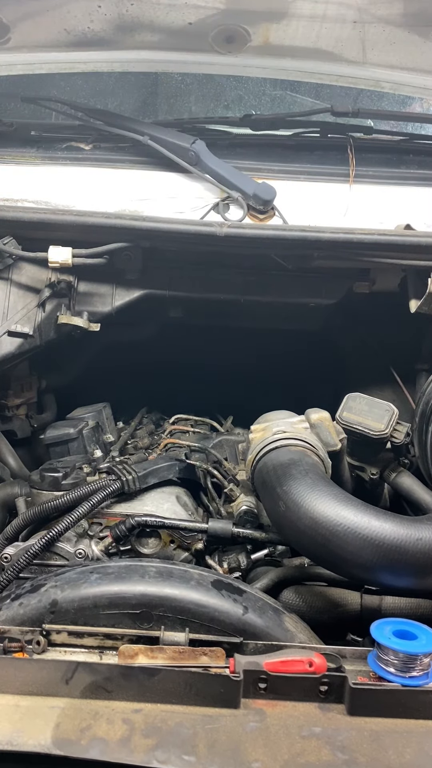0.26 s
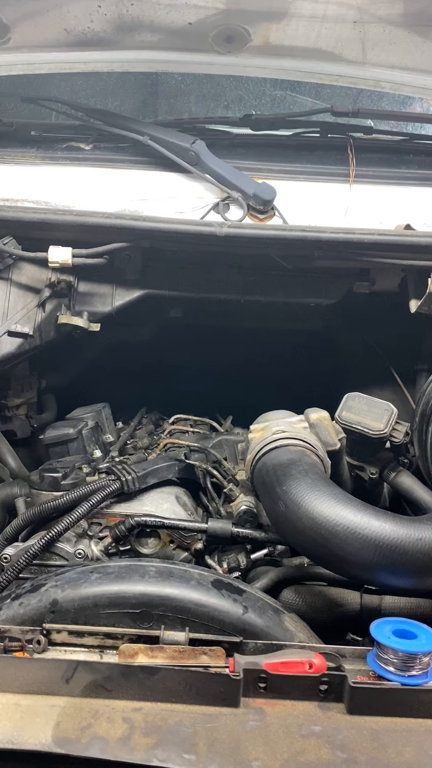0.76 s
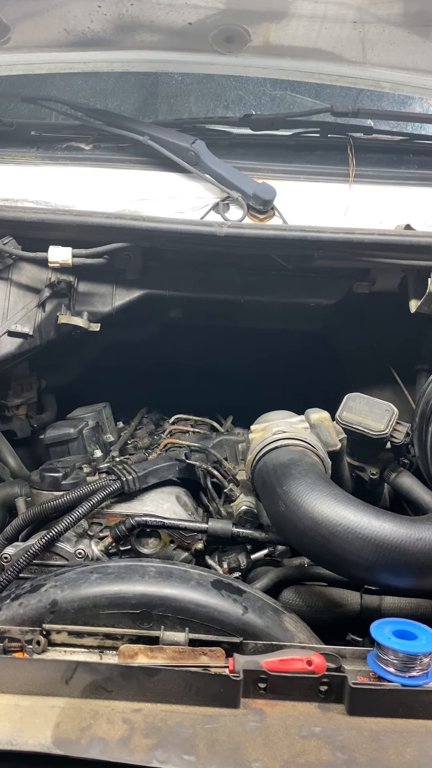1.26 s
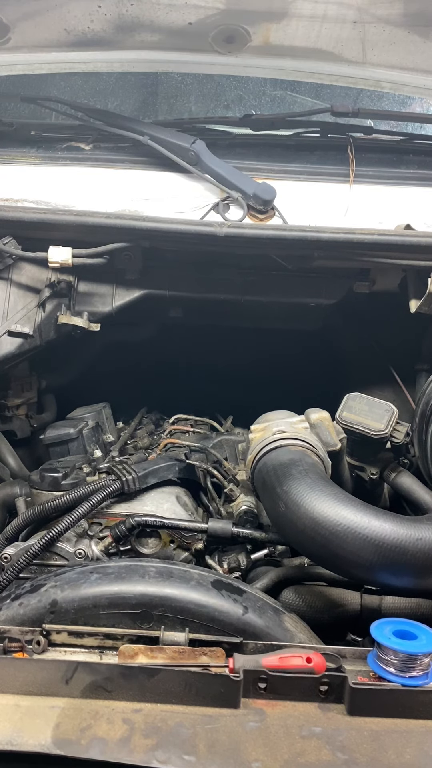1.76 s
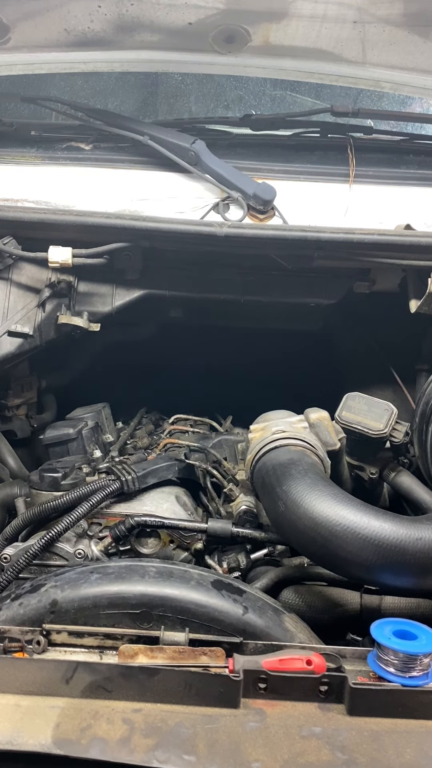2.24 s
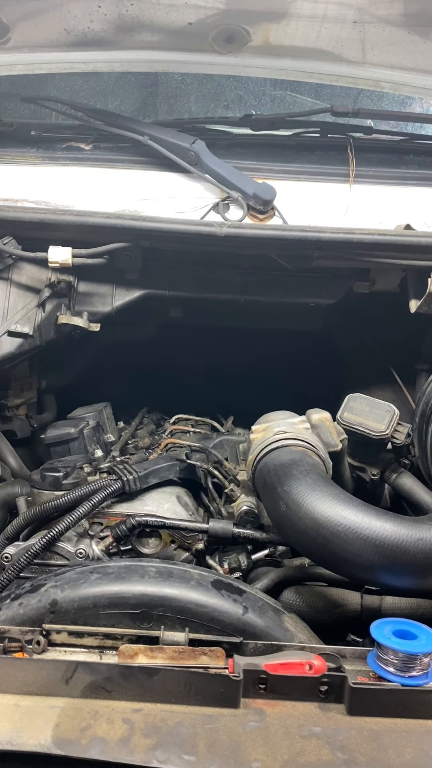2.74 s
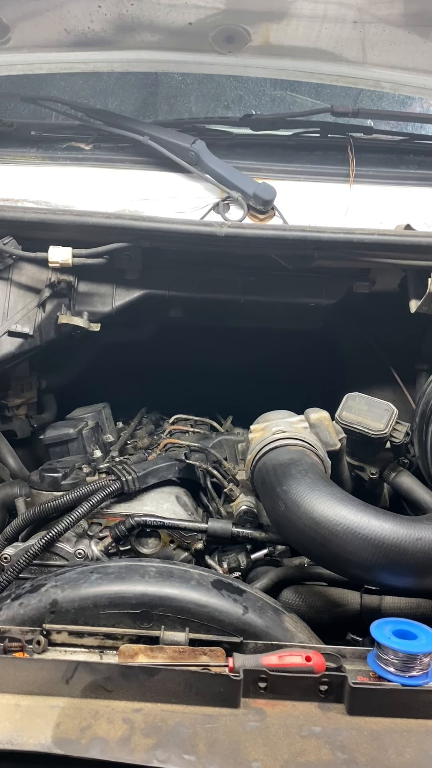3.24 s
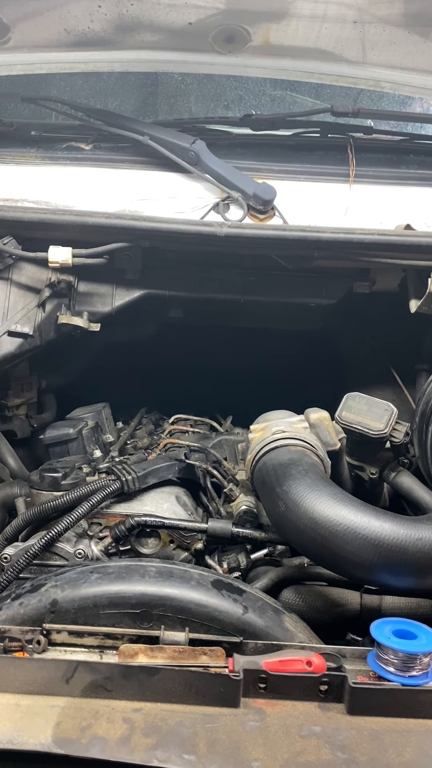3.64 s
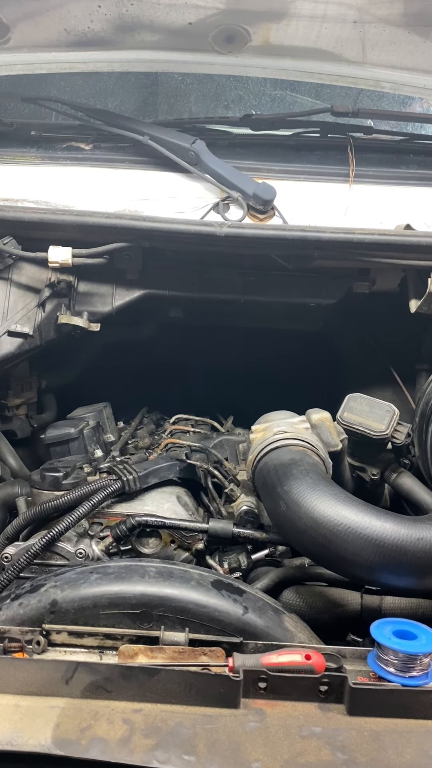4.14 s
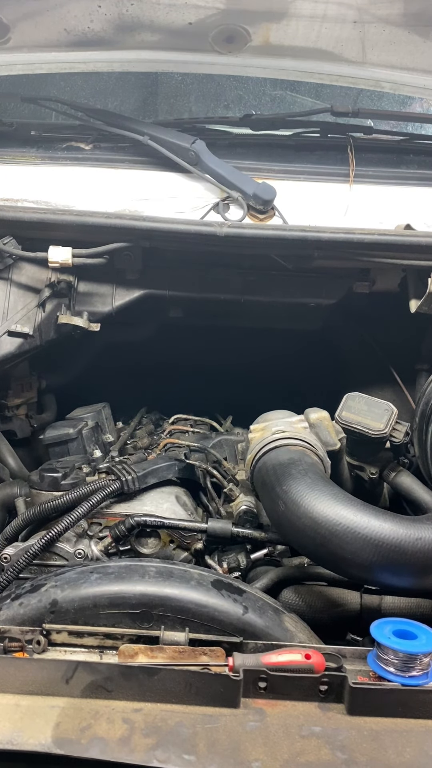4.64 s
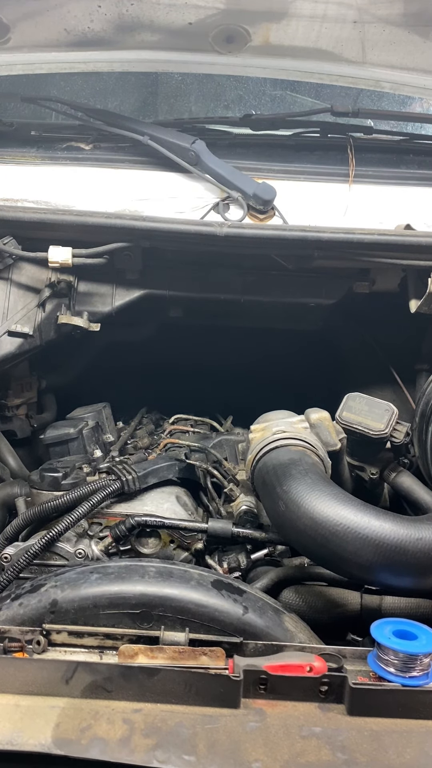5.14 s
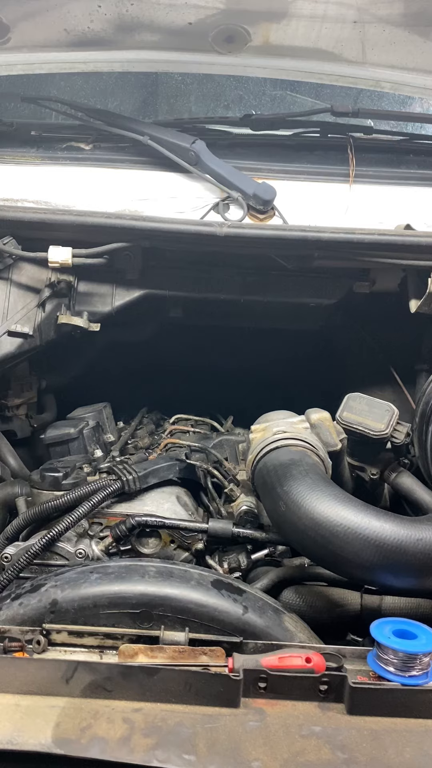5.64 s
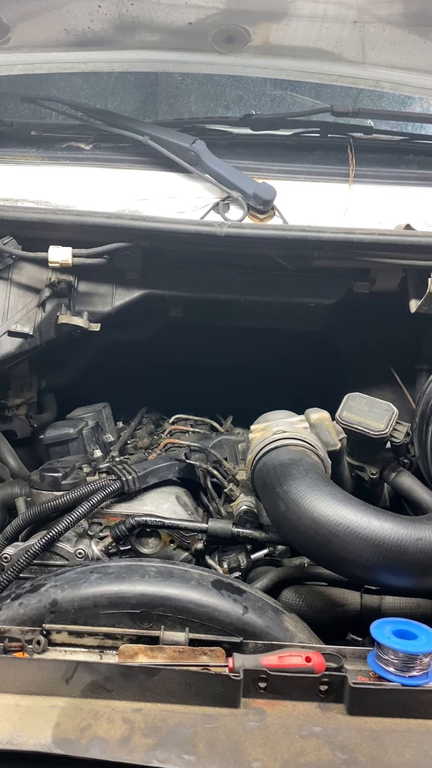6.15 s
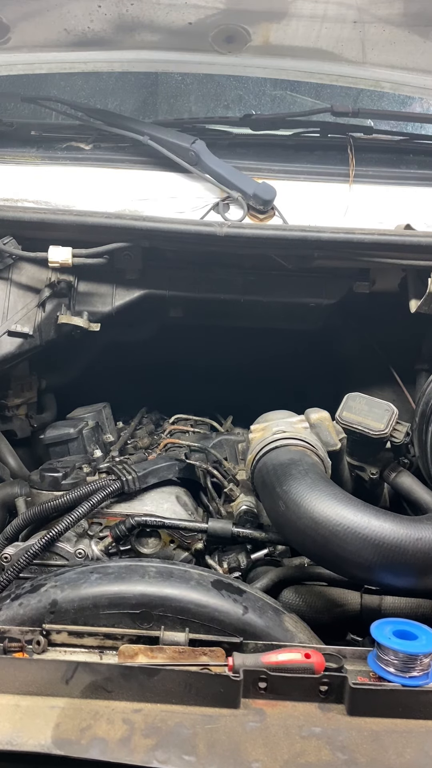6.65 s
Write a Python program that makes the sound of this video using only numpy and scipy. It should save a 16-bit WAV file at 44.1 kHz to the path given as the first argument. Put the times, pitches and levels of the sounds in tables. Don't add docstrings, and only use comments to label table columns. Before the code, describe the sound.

From 0 s the starter is already engaged, and it cranks a five-cylinder diesel without a break until about 7 s. Around seven strokes pass each second, grouped in uneven fives lasting about 0.7 s. Each stroke opens with a short bright rattle as gear teeth catch, swells into a coarse midrange grind as compression slows the crank, then loosens as it springs onward. The tooth growl bends between roughly 350 and 440 Hz, with hollow ringing from sump, covers and bell housing and an unsteady whine. Brushes and belts whirr beneath, with low body rumble, soft intake thuds and booming pipe puffs. The first two seconds ring slightly heavier; at 2.7 s a belt gives one tiny high chirp. The pace sags almost imperceptibly. No ignition, no wind-down. Close, dry outdoor phone pickup, nearly mono with slight stereo spread.

```python
import sys
import numpy as np
from scipy import signal
from scipy.fft import rfft, irfft, next_fast_len
from scipy.io import wavfile
from scipy.ndimage import uniform_filter1d, map_coordinates

SR = 44100
rng = np.random.default_rng(int(sys.argv[2]) if len(sys.argv) > 2 else 0)


def unload_wav(signal):
    wavfile.write(
        sys.argv[1],
        SR,
        np.round(np.clip(np.atleast_2d(signal).T, -1, 1) * 32767).astype(np.int16),
    )


def volts_from_decibels(level):
    exponent = np.asarray(level, float) / 20
    return 10 ** exponent


N = 304290
TIME = np.arange(N) / SR
HZ = np.fft.rfftfreq(next_fast_len(N + 16384), 1 / SR)


def unit(x):
    return x / np.sqrt(np.mean(x ** 2) + 1e-20)


def along(points):
    f, db = np.transpose(points)
    return volts_from_decibels(np.interp(np.log(HZ + 1), np.log(f + 1), db))


def mode(hz, width):
    return 1j * HZ * width / (hz * hz - HZ * HZ + 1j * HZ * width)


def modes(rows):
    return sum(volts_from_decibels(db) * mode(hz, width) for hz, width, db in rows)


def block(spectrum, depth_db, body):
    return along(spectrum) * (1 + volts_from_decibels(depth_db) * body)


def filtered(x, response):
    size = 2 * len(HZ) - 2
    return irfft(rfft(x, size) * response, size)[..., :N]


def wobble(rate):
    coarse = TIME[::32]
    knots = rng.standard_normal(int(N * rate / SR) + 4)
    return np.interp(TIME, coarse, map_coordinates(knots, [coarse * rate]))


def held(x, steady):
    size = np.sqrt(np.abs(uniform_filter1d(unit(x) ** 2, size=900))) + 0.34
    return unit(x / size ** steady)


# (start t/s, sump level/dB, cover level/dB, bell housing level/dB, late first load [share of stroke])
CYCLES = [(-0.324, 4, 4, 1, 0.14), (0.369, 1.8, -1, -3.5, 0.12), (1.061, 1.3, 1, 0, 0.13),
          (1.752, 1.7, -1, 0.5, 0.018), (2.445, 1.5, -1, 1, 0), (3.138, 0.7, -0.8, 0.2, 0),
          (3.833, -0.5, 1.5, -0.4, 0), (4.528, -0.2, 0.3, -0.1, 0.0097), (5.225, 0.2, -0.3, 0.4, 0),
          (5.922, -0.2, 2, 1.7, 0.043), (6.619, -0.6, 0, 1, 0.039), (7.316, 0, 0, 0, 0)]


def every_cycle(shares):
    start = np.array(CYCLES)[:, 0]
    return (start[:-1, None] + np.diff(start)[:, None] * shares).ravel()


# (t [share of cycle], slack closing level/dB)
TAKE_UP = [
    (0.003, 1),
    (0.2493, 5),
    (0.4667, 5),
    (0.665, 4),
    (0.801, 1),
]


def strokes():
    start = every_cycle(np.array(TAKE_UP)[:, 0])
    return np.interp(TIME, start, np.arange(len(start)))


def chance(stroke, scatter_db):
    which = stroke.astype(int)
    return scatter_db * rng.standard_normal(which.max() + 1)[which]


# (fast t [share of stroke], fast tooth rate f/Hz, slow t [share of stroke], slow tooth rate f/Hz)
SPEED = [(0.13, 429, 0.65, 358), (0.04, 437, 0.58, 353), (0.04, 437, 0.55, 358), (0.05, 442, 0.67, 381),
         (0.16, 430, 0.81, 371)]


def crank_speed(stroke):
    order = np.arange(5)
    fast_at, fast, slow_at, slow = np.transpose(SPEED)
    turning_points = np.c_[order + fast_at, order + slow_at].ravel()
    turning_points = np.r_[slow_at[-1] - 1, turning_points, 5 + fast_at[0]]
    ends = np.r_[slow[-1], np.c_[fast, slow].ravel(), fast[0]]
    swing = np.interp(stroke % 5, turning_points, np.arange(12))
    part = swing.astype(int)
    return ends[part] + (ends[part + 1] - ends[part]) * np.sin(np.pi / 2 * (swing - part)) ** 2


# (catching level/dB, full t [share of stroke], full level/dB,
# letting go t [share of stroke], running free level/dB)
LOAD = [(-36, 0.31, -32, 0.65, -48), (-34, 0.52, -30.5, 0.46, -47), (-32.5, 0.51, -30, 0.37, -44),
        (-31.5, 0.11, -32.5, 0.73, -39.5), (-36, 0.32, -32, 0.76, -41)]


def gear_load(stroke):
    catch = .05
    slip_at, slip_done = .38, .55
    order = np.arange(5)
    first_db, full_at, full_db, go_at, free_db = np.transpose(LOAD)
    slip = go_at + slip_at * (1 - catch - go_at)
    slip_db = full_db + slip_done * (free_db - full_db)
    at = order[:, None] + np.c_[catch + 0 * full_at, full_at, go_at, slip, 1 - catch + 0 * full_at]
    db = np.c_[first_db, full_db, full_db, slip_db, free_db]
    load_db = np.interp(stroke, at.ravel(), db.ravel(), period=5)
    which = stroke.astype(int)
    late = (which % 5 == 0) * (stroke - which < np.array(CYCLES)[which // 5, -1])
    return load_db - 9 * uniform_filter1d(late * 1., size=400)


def ring_level(stroke, load_db, rows, column, sag_db, struck_db, scatter_db):
    which = stroke.astype(int)
    done = stroke - which
    hum_db, flare_at, flare_db, width = np.array(rows)[which % 5].T
    hum = volts_from_decibels(hum_db + sag_db * done + 1.3 * (load_db + 31))
    struck = 1 + volts_from_decibels(struck_db) * np.exp(-done / .05)
    flare = volts_from_decibels(flare_db) * np.exp(-((done - flare_at) / width) ** 2)
    cycle_db = np.array(CYCLES)[which // 5, column]
    size = (hum * struck + flare) * volts_from_decibels(cycle_db + chance(stroke, scatter_db))
    return 20 * np.log10(uniform_filter1d(size, size=300))


def teeth(rate, jitter, scatter_db, rough):
    at = np.flatnonzero(np.diff(np.floor(np.cumsum(rate) / SR)))
    luck = rng.standard_normal((len(at), 2))
    at = np.clip(at + jitter * luck[:, 0] * SR / rate[at], 0, N - 1).astype(int)
    blows = unit(np.bincount(at, volts_from_decibels(scatter_db * luck[:, 1]), N))
    scrape = unit(volts_from_decibels(1.48 * wobble(300)) * rng.standard_normal(N))
    return np.sqrt(1 - rough) * blows + np.sqrt(rough) * scrape


# (f/Hz, level/dB per Hz)
GRIND = [(150, -44), (230, -23.5), (400, -13), (900, -12.5), (1600, -11), (3000, -9.5), (4500, -15.5),
         (6000, -19), (7400, -29), (10000, -34.5), (13000, -34.5), (15600, -41)]
# (f/Hz, width f/Hz)
SUMP = (391, 10.1)
# (f/Hz, width f/Hz)
COVER = (546, 18.7)
# (f/Hz, width f/Hz)
BELL = (1252, 15.8)
# (hum level/dB, flare t [share of stroke], flare level/dB, flare width [share of stroke])
SUMP_RINGS = [(-79, 0.57, -38.5, 0.19), (-52, 0.48, -35.5, 0.11), (-46.5, 0.42, -37.5, 0.17),
              (-38.5, 0.563, -40, 0.054), (-71, 0.73, -38.5, 0.27)]
# (hum level/dB, flare t [share of stroke], flare level/dB, flare width [share of stroke])
COVER_RINGS = [(-56, 0.47, -43, 0.11), (-49, 0.14, -40, 0.41), (-40, 0.017, -38.5, 0.11),
               (-41, 0.23, -41, 0.43), (-50, 0.62, -45, 0.1)]
# (hum level/dB, flare t [share of stroke], flare level/dB, flare width [share of stroke])
BELL_RINGS = [(-30, 0.25, -27.5, 0.047), (-35.5, 0.44, -37, 0.041), (-42, 0.27, -35, 0.077),
              (-37.5, 0.36, -34, 0.13), (-35.5, 0.44, -27.5, 0.07)]


def gears(stroke, rate, load_db, grind_db, body):
    through_iron = np.exp(-1j * np.pi * 2e-6 * np.minimum(HZ, 5000) * HZ)
    drive = teeth(rate, jitter=.055, scatter_db=2, rough=.62)
    grind = unit(filtered(drive, block(GRIND, depth_db=1, body=body) * through_iron))
    grind = grind * volts_from_decibels(grind_db + .7 * wobble(40))

    sump_db = ring_level(stroke, load_db, SUMP_RINGS, column=1, sag_db=2, struck_db=-17, scatter_db=.7)
    sump = filtered(teeth(rate, jitter=.06, scatter_db=2, rough=.6), mode(*SUMP) * mode(391, 200))
    sump = volts_from_decibels(sump_db) * held(sump, steady=.85)

    cover_db = ring_level(stroke, load_db, COVER_RINGS, column=2, sag_db=-1.5, struck_db=-10, scatter_db=1.5)
    cover = filtered(teeth(rate, jitter=.1, scatter_db=3, rough=.8), mode(*COVER) * mode(546, 250))
    cover = volts_from_decibels(cover_db) * held(cover, steady=.7)

    bell_db = ring_level(stroke, load_db, BELL_RINGS, column=3, sag_db=-12.5, struck_db=6, scatter_db=.7)
    bell = filtered(teeth(rate, jitter=.05, scatter_db=2, rough=.6), mode(*BELL) * mode(1255, 150))
    bell = volts_from_decibels(bell_db) * held(bell, steady=.92)
    return grind + sump + cover + bell


# (f [multiple of tooth rate], level/dB)
LOADED_ORDERS = [(1, -50), (2, -48), (3, -43), (5, -46), (7.2, -48), (7.45, -41), (7.7, -48), (14.9, -57)]
# (f [multiple of tooth rate], level/dB)
FREE_ORDERS = [(10, -57), (15, -63), (20, -61), (30, -70)]


def whine(rate, grind_db, body):
    turn = 2 * np.pi * np.cumsum(rate) / SR

    def tones(orders, blur):
        return sum(volts_from_decibels(db + 3 * wobble(70)) * np.sin(k * turn + blur * wobble(200)) for k, db in orders)

    load = volts_from_decibels(grind_db + 32)
    free = np.clip(1 - load / .45, 0, 1)
    lines = load ** 1.5 * tones(LOADED_ORDERS, blur=.5) + free * tones(FREE_ORDERS, blur=1.2)
    return filtered(lines, .8 + .6 * body)


# (f/Hz, width f/Hz, level/dB)
LONG_PIPE = [(77, 30, -2), (106, 21, 1)]
# (f/Hz, width f/Hz, level/dB)
SHORT_PIPE = [(107, 12, -8.5), (154.6, 6.9, 0.5)]
# (f/Hz, level/dB per Hz)
WHIRR = [(150, -54), (230, -16.5), (400, -9), (900, -21.5), (2000, -11.5), (4000, -11), (6000, -14),
         (7400, -21), (10000, -25), (13000, -29), (15600, -41)]
# (f/Hz, level/dB per Hz)
RUMBLE = [(15, -38), (33, -4), (48, -17), (100, -12.5), (200, -6.5), (300, -12), (500, -60)]


def background(grind_db, body):
    whirr = unit(filtered(rng.standard_normal(N), block(WHIRR, depth_db=-5.5, body=body)))
    whirr = whirr * volts_from_decibels(-40.5 + 0.11 * (grind_db + 37) + 0.65 * wobble(30))
    hum = along(RUMBLE) * (1 + volts_from_decibels(7) * modes(LONG_PIPE + SHORT_PIPE))
    rumble = unit(filtered(rng.standard_normal(N), hum))
    rumble = rumble * volts_from_decibels(-58 + 0.22 * (grind_db + 41.5) + 1.1 * wobble(14))
    return whirr + rumble


# (t [share of cycle], level/dB)
GULPS = [
    (0.15, -10),
    (0.325, 0),
    (0.485, -4),
    (0.585, -1.5),
    (0.73, -4),
]
# (f/Hz, width f/Hz)
INTAKE = (296, 70)


def intake():
    when, db = np.transpose(GULPS)
    s = every_cycle(when)
    size = volts_from_decibels(np.resize(db, len(s)) + 1.5 * rng.standard_normal(len(s)))
    size = size * (s > 0) * (s < N / SR)
    gulps = np.bincount(np.clip(s * SR, 0, N - 1).astype(int), size, N)
    return filtered(gulps, volts_from_decibels(8.5) * mode(*INTAKE) ** 2)


# (t [share of cycle], level/dB, share going up the short pipe)
PUFFS = [
    (0.0135, -42, 0.1),
    (0.223, -39.5, 0.12),
    (0.4226, -36, 1),
    (0.617, -38.5, 1),
    (0.806, -46, 0.71),
]
# (f/Hz, width f/Hz)
BOOM = (130, 18)


def valves():
    when, db, short = np.transpose(PUFFS)
    s = every_cycle(when)
    db = np.resize(db, len(s)) + .6 * rng.standard_normal(len(s))
    short = np.resize(short, len(s))
    at = np.clip(np.round((s - .008) * SR).astype(int), 0, N - 1)
    size = (s > 0) * (s < N / SR) * volts_from_decibels(db + 48)
    boom = volts_from_decibels(-4.5) * mode(*BOOM) * 1.23
    short_air = filtered(np.bincount(at, short * size, N), boom + volts_from_decibels(8.5) * modes(SHORT_PIPE))
    long_air = filtered(np.bincount(at, (1 - short) * size, N), boom + volts_from_decibels(2) * modes(LONG_PIPE))
    return -filtered(short_air + long_air, mode(115, 69) * mode(93, 230))


def slack(body):
    when, db = np.transpose(TAKE_UP)
    s = every_cycle(when)
    at = np.clip(np.round(s * SR).astype(int), 0, N - 1)
    hits = np.bincount(at, (s > 0) * volts_from_decibels(np.resize(db, len(s))), N)
    t = TIME[:4000]
    fade = volts_from_decibels(-60 * t / .12) * (1 - np.exp(-t / .008))
    dying = signal.fftconvolve(hits, fade)[:N]
    brighter = np.sqrt(1 + (HZ / 5000) ** 2)
    rattle = filtered(rng.standard_normal(N), block(GRIND, depth_db=3, body=body) * brighter)
    return volts_from_decibels(-30) * dying * unit(rattle)


# (t/s, f/Hz, level/dB)
SQUEAK = (2.688, 4380, -33)


def squeak():
    s, hz, db = SQUEAK
    t = TIME - s
    return volts_from_decibels(db) * np.exp(-(t / .005) ** 2) * np.sin(2 * np.pi * hz * t)


# (f/Hz, width f/Hz, level/dB)
BLOCK = [(338, 86, 6.5), (491, 11, 17.5), (677, 80, 11), (806, 51, 6), (970, 56, 6.5), (1065, 19.6, 3),
         (1340, 147, 6), (1457, 16, 7.5), (1750, 210, -8), (2056, 26.7, 12.5), (2133, 26, 1), (2470, 39, 0),
         (2623, 17, -1.5), (3150, 13, -4), (3174, 9.7, 3), (3755, 7.6, 7), (4136, 7.7, 8.5),
         (4630, 23, -11), (5025, 92, 3), (5397, 45, 9), (5530, 62, -3), (6190, 53, -1), (7900, 100, -0.5),
         (8400, 100, -3), (9080, 140, 1.5)]
# (f/Hz, level/dB)
LEAN = [(300, .3), (600, -.8), (1250, -2.8), (2400, -1), (3600, 0)]
# (f/Hz, level/dB)
SPREAD = [(40, -30), (300, -18.5), (700, -17), (1400, -14.5), (2400, -14), (3250, -15), (3550, -44),
          (15000, -50)]


def scene():
    stroke = strokes()
    rate = crank_speed(stroke)
    load_db = gear_load(stroke)
    grind_db = load_db + uniform_filter1d(chance(stroke, scatter_db=.3), size=600)
    body = modes(BLOCK)
    engine = gears(stroke, rate, load_db, grind_db, body) + whine(rate, grind_db, body)
    engine = engine + background(grind_db, body) + intake() + valves() + slack(body) + squeak()
    drift = 3 * wobble(22)
    side = np.cos(drift) * filtered(engine, along(SPREAD))
    side = side + np.sin(drift) * filtered(engine, 1j * along(SPREAD))
    lean = np.sqrt(along(LEAN))
    return np.array([filtered(engine, lean) + side, filtered(engine, 1 / lean) - side])


def top_cut(x):
    return signal.sosfilt(signal.butter(12, 15670, fs=SR, output="sos"), x)


def record(dry):
    mix = filtered(dry, HZ < 15680)
    return top_cut(mix)


dry = scene()
out = record(dry)
unload_wav(out)
```